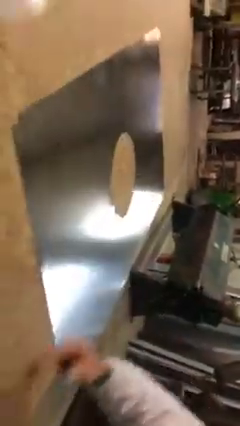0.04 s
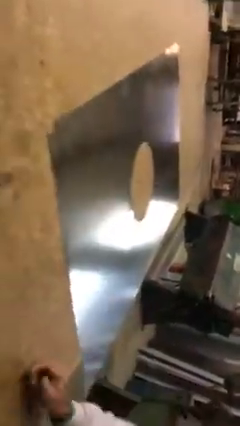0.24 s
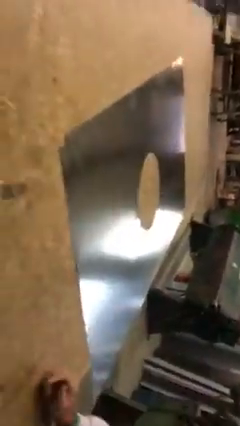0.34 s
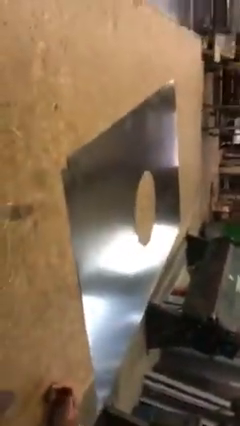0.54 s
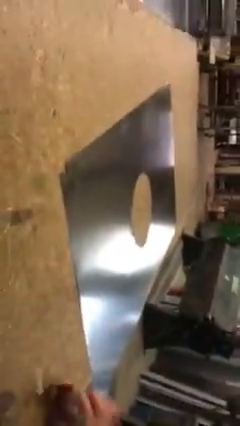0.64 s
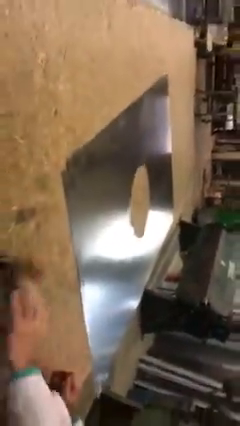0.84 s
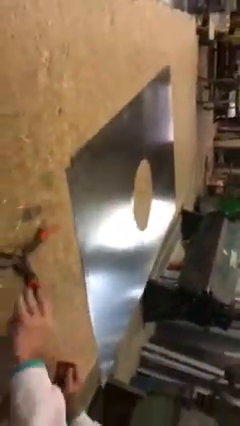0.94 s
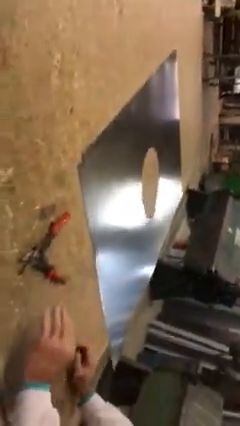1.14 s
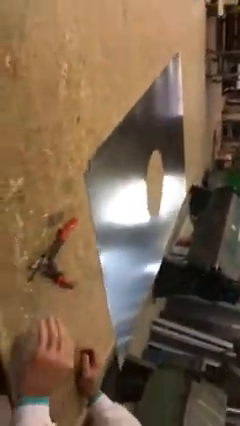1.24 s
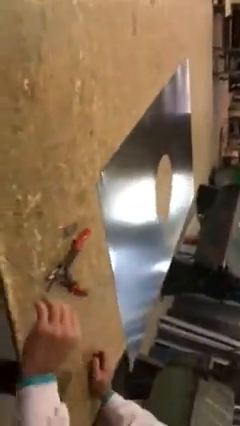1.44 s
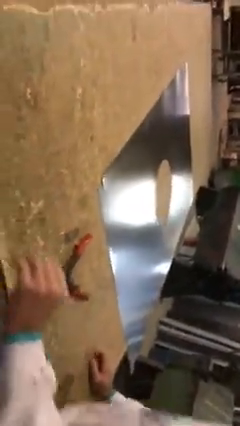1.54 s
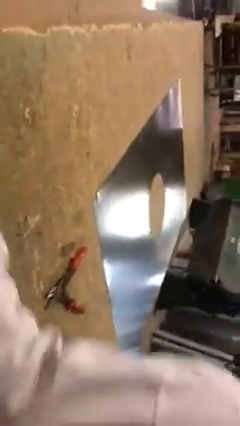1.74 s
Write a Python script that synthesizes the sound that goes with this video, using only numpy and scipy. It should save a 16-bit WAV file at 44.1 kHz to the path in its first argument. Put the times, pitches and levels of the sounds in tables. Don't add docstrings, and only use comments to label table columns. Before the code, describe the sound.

Thin sheet metal crashes and wobbles onto a wood bench, followed by dropped snips knocking and rattling

```python
import sys
import numpy as np
from scipy import signal
from scipy.fft import rfft, irfft
from scipy.io import wavfile

SR = 44100
rng = np.random.default_rng(int(sys.argv[2]) if len(sys.argv) > 2 else 0)


def boost(x):
    u = np.asarray(x, float) / 20
    return 10 ** u


def log_audio(samples):
    frames = np.atleast_2d(samples).T
    limited = np.clip(frames, -1, 1)
    pcm = np.round(limited * 32767).astype(np.int16)
    wavfile.write(sys.argv[1], SR, pcm)


N = 79380

# t/s, force level/dB, crash centre f/Hz,
# edge rattle level/dB re force, lowest free mode f/Hz
SHEET_LANDINGS = [
    [(.209, -17, 795, -4.5, 250), (.235, -8, 1430, -21, 352), (.257, -12, 1960, -9.5, 485),
     (.29, -15.5, 2230, -12.5, 510), (.315, -17.5, 1600, -13.5, 465), (.345, -17, 1420, -9.5, 480),
     (.37, -17, 1690, -11, 566), (.41, -23, 1830, -8, 540), (.45, -24, 1750, -14.5, 543)],
    [(.462, -22.5, 740, -7, 396), (.486, -20, 865, -13.5, 447), (.512, -17.5, 1300, -2.5, 510),
     (.535, -15, 2150, -9.5, 590), (.575, -20, 2200, -9, 640), (.61, -20.5, 1760, -10.5, 700),
     (.655, -30, 1840, -11.5, 764), (.72, -32.5, 2000, -10.5, 900), (.794, -39.5, 2050, -16.5, 1000),
     (.838, -38, 2030, -8, 1010), (.872, -44, 1780, -6.5, 1010)],
]
# f/Hz, level/dB
SHEET_COLOUR = [(150, -1.5), (300, -36), (620, 0.5), (1200, 7), (1800, 1.5), (2800, 3.5), (3600, -0.5),
                (5000, -53)]
# f/Hz, level/dB
RATTLE_COLOUR = [(2060, -14.5), (3500, -7), (4750, -11.5), (6280, -13), (15100, -29), (16000, -25)]
# f/Hz, level/dB
BENCH_COLOUR = [(25, -27), (45, -21), (75, -11.5), (130, -15.5), (250, -10), (480, -16.5), (650, -36)]
# t/s, peak level/dB, f/Hz
BUCKLE_POPS = [(0.211, -22, 1200), (0.22, -10, 2380), (0.225, -8.5, 1150), (0.231, -14.5, 706),
               (0.231, -10, 2240), (0.237, -11, 1420), (0.242, -6.5, 1830), (0.245, -16, 1400),
               (0.243, -14.5, 2480), (0.246, -21, 2360), (0.255, -14.5, 1640), (0.255, -9, 2360),
               (0.26, -8, 1700), (0.261, -7.5, 2160), (0.274, -6.5, 1780), (0.278, -6.5, 2050),
               (0.29, -15, 2070), (0.323, -12.5, 693), (0.332, -17, 2660), (0.334, -15.5, 1280),
               (0.35, -15.5, 1700), (0.351, -22.5, 1260), (0.352, -16, 3000), (0.354, -16, 2280),
               (0.359, -17, 1370), (0.377, -14.5, 1266), (0.38, -13.5, 1750), (0.48, -12.5, 890),
               (0.502, -20, 1310), (0.513, -16, 1400), (0.518, -18.5, 1570), (0.53, -12, 2690),
               (0.532, -12, 1660), (0.535, -19, 3330), (0.537, -15, 2660), (0.541, -11.5, 1720),
               (0.548, -13, 1760), (0.55, -23, 2850), (0.558, -16, 2880), (0.56, -18, 2300),
               (0.562, -12, 1715), (0.566, -20, 2830), (0.569, -21, 2120), (0.573, -21, 2110),
               (0.584, -14, 1670), (0.587, -15.5, 1380)]
THUD_TIMES = [.109, .210, .214, .214, .465, .505, .522, .61, .8925, .894, .902, .907, .93, .94, 1.03, 1.596,
              .11, .34, .545, 1.6, 1.603]
# level/dB, f/Hz, t60/s
THUD_TONES = [(-38, 250, 0.05), (-14, 334, 0.044), (-16.5, 630, 0.2), (-19.5, 67, 0.26),
              (-33.5, 300, 0.024), (-36, 73, 0.17), (-26.5, 390, 0.057), (-36, 81, 0.57), (-10, 720, 0.027),
              (-40, 1200, 0.018), (-23, 348, 0.11), (-24.5, 690, 0.074), (-30, 69, 0.79),
              (-26.5, 142, 0.11), (-36.5, 158, 0.25), (-31.5, 304, 0.078), (-45.5, 460, 0.033),
              (-27.5, 610, 0.075), (-32, 220, 0.091), (-40, 460, 0.024), (-39, 770, 0.034)]
# t/s, peak level/dB, knock f/Hz,
# jaw rattle level/dB re peak
WOOD_BLOWS = [(0.1105, -42, 1020, -29), (.20865, -3, 2120, -8.5), (.8912, -8.5, 1760, 0),
              (.894, -7, 2580, -7), (.896, -23.5, 950, -19), (0.9158, -25.5, 900, 4.5),
              (0.932, -24, 1860, 1), (0.9016, -19, 2300, -27), (0.9353, -33, 1510, 11),
              (0.9363, -18.5, 1930, -23), (0.9389, -2.5, 2590, -29.5), (.9425, -21.5, 1510, -7),
              (0.9669, -1.5, 1270, -22), (0.9713, -15, 1400, -22), (.993, -16, 1100, -20),
              (1.0027, -10, 1173, -24), (1.0054, -17.5, 1200, -21), (1.026, -27, 2300, -24),
              (1.031, -21, 1500, -27), (1.0493, -14, 1300, -36), (1.0657, -15, 1490, -42),
              (1.088, -15.5, 1640, -43), (1.105, -34.5, 918, -38), (1.5952, -26.5, 1255, -30)]
KNOCK_BAND = [480, 5200]
# f/Hz, level/dB
WOOD_COLOUR = [(120, -17.5), (220, 1), (400, -4), (750, -3.5), (1300, -0.5), (2500, -4), (4500, -7.5),
               (8000, -23.5)]
# f/Hz, width/Hz, level/dB
JAW_MODES = [(4270, 600, -8), (6340, 130, -19.5), (6560, 830, -7), (9060, 1400, -1.5), (13900, 3400, -7)]
# t/s, length/s, level/dB, bright share level/dB
RUBS = [
    (0.0, 0.088, -65.5, -10),
    (0.113, 0.038, -62, -6),
    (0.807, 0.025, -55, 2),
    (1.172, 0.046, -51.5, -6.5),
    (1.25, 0.12, -67.5, -3.5),
    (1.45, 0.042, -72, -10),
    (1.604, 0.038, -44, 2),
    (1.634, 0.018, -50, -8),
]
# f/Hz, level/dB
HISS_COLOUR = [(2350, -32), (4000, -8), (5570, 8), (7530, -1.5), (11600, -3.5), (15100, -7.5), (16000, -21)]
# f/Hz, level/dB
BODY_COLOUR = [(290, -53.5), (500, -17), (1440, -11.5), (2120, -3.5), (2300, -6), (4500, -19),
               (5850, -49.5), (9900, -120)]
# middle t/s, length/s, level/dB, f/Hz
RUB_NOTES = [(0.003, 0.046, -53, 1830), (0.039, .035, -52, 1780), (0.079, .025, -56, 1800),
             (0.138, .014, -57, 2560), (0.1994, .007, -43.5, 3074), (1.205, 0.026, -55, 3480),
             (1.197, 0.039, -49, 2480), (1.588, .01, -53, 1450), (1.611, 0.021, -45, 2130),
             (1.633, 0.023, -33.5, 2160), (1.653, .014, -39.5, 3080), (1.656, 0.038, -36.5, 1970),
             (1.647, 0.065, -49, 1630), (1.665, 0.034, -43, 2610), (1.64, .03, -41, 2830),
             (1.708, .02, -49, 2150)]
# t/s, length/s, level/dB, centre f/Hz, width/Hz
CLOTH_WHISPERS = [
    (.915, .008, -44, 9000, 1500),
    (1.185, .045, -58, 12500, 2500),
    (1.46, .06, -73, 9000, 2200),
]
# f/Hz, level/dB
SHOP_COLOUR = [(15, -49), (32, -18.5), (84, -18.5), (123, -21.5), (185, -30), (242, -29), (309, -39),
               (887, -46), (16000, -72.5)]
# t/s, level/dB
MOTOR_RISE = [(1.2, -86), (1.244, -47), (1.8, -37)]


def in_time(rows):
    s, *columns = np.transpose(rows)
    return [np.interp(np.arange(N) / SR, s, column) for column in columns]


def rms_one(x):
    return x / np.sqrt(np.mean(x ** 2) + 1e-20)


def colour(x, points):
    hz, db = np.transpose(points)
    log_f = np.log(np.maximum(np.fft.rfftfreq(len(x), 1 / SR), 1))
    gain = boost(np.interp(log_f, np.log(hz), db, left=-90, right=-90))
    return rms_one(irfft(rfft(x) * gain, len(x)))


def low_pass(x, hz):
    return signal.sosfilt(signal.butter(2, hz, fs=SR, output="sos"), x)


def band_pass(x, low, high):
    return signal.sosfilt(signal.butter(2, [low, high], "band", fs=SR, output="sos"), x)


def ring(x, hz, t60):
    r, w = boost(-60 / (t60 * SR)), 2 * np.pi * hz / SR
    return signal.lfilter([0, np.sin(w)], [1, -2 * r * np.cos(w), r * r], x + 1e-18)


def click(s, db):
    x = np.zeros(N)
    x[int(s * SR)] = boost(db)
    return x


def grains(rate, spread_db):
    sizes = boost(spread_db * np.minimum(rng.exponential(1, N), 5)) * rng.choice([-1, 1], N)
    return rms_one(sizes * (rng.random(N) < rate / SR))


def dying(t60, seconds):
    t = np.arange(int(seconds * SR)) / SR
    x = rng.standard_normal(len(t)) * boost(-60 * t / t60)
    return x / np.sqrt(np.sum(x ** 2))


def sheet_drive(centre, lowest):
    focus_db, focus_oct, edge_db_per_oct = 6, 0.55, 26
    touches = colour(grains(7000, 2.5), SHEET_COLOUR)
    drive = np.zeros(N)
    edges = 140 * 2 ** (np.arange(17) / 3)
    for low, high in zip(edges, edges[1:]):
        hz = np.sqrt(low * high)
        near = np.exp(-(np.log2(hz / centre) / focus_oct) ** 2 / 2)
        below_modes = np.maximum(np.log2(lowest / hz), 0)
        gain_db = focus_db * (near - 0.5) - edge_db_per_oct * below_modes
        drive += band_pass(touches, low, high) * boost(gain_db)
    return drive


def sheet_wash(drive):
    t60_s, reshape_s = 0.3, 0.04
    t = np.arange(N) / SR
    wash = np.zeros(N)
    for k in range(24):
        share = np.sqrt(np.maximum(1 - np.abs((t - 0.2) / reshape_s - k), 0))
        wash += signal.fftconvolve(drive * share, dying(t60_s, 0.25))[:N]
    return wash


def sheet():
    rows = list(SHEET_LANDINGS[0]) + list(SHEET_LANDINGS[1])
    force, centre, edge, lowest = in_time(rows)
    t = np.arange(N) / SR
    on = (t >= rows[0][0]) * np.exp(-np.maximum(t - rows[-1][0], 0) / 0.06)
    drive = sheet_drive(centre, lowest) * on * boost(force)
    rattle = colour(grains(9000, 1.2), RATTLE_COLOUR) * on * boost(force + edge - 1)
    airborne = (t > 0.365) & (t < 0.46)
    rumble_db = -43 + 1.07 * (force + 21.0) - 11.5 * airborne
    rumble = colour(rng.standard_normal(N), BENCH_COLOUR) * on * boost(rumble_db)
    return rumble + 1.51 * drive + boost(-5) * sheet_wash(drive) + rattle


def pops():
    t60_s = 0.022
    out = np.zeros(N)
    for s, db, hz in BUCKLE_POPS:
        out += ring(ring(click(s, db), hz, t60_s), hz, 4.35 / hz) * 3.54 * hz / SR
    return out


def thuds():
    out = np.zeros(N)
    for s, (db, hz, t60) in zip(THUD_TIMES, THUD_TONES):
        push = ring(ring(click(s, db), hz, t60), hz, 2 / hz)
        out += low_pass(push * 7 * hz / SR, 1500)
    return out


def wood_blow(db, hz):
    contact_cycles, travel_cycles = 0.14, 2.5
    arrival_centre, arrival_spread = 0.96, 0.24
    wood_t60_s, wood_rise_s = 0.032, 0.0015
    t, age = np.arange(-128, 3968) / SR, np.arange(4096) / SR
    late = np.maximum(1 + t * hz / travel_cycles, 0.05)
    arrival = np.exp(-(np.log(late / arrival_centre) / arrival_spread) ** 2 / 2)
    knock = boost(db + 0.5) * arrival * np.cos(2 * np.pi * travel_cycles / late)
    push = boost(db) * np.exp(-(t * hz / contact_cycles) ** 2 / 2)
    wood = colour(rng.standard_normal(4096), WOOD_COLOUR)
    wood = wood * boost(-60 * age / wood_t60_s) * (1 - np.exp(-(age / wood_rise_s) ** 2))
    answer = signal.fftconvolve(push, wood)[:len(t)] * hz / SR
    return band_pass(knock, *KNOCK_BAND) + boost(2) * answer


def jaw_chatter(blows):
    t60_s = 0.017
    decay = boost(-60 / (t60_s * SR))
    chatter = signal.lfilter([1], [1, -decay], blows + 1e-18) * grains(9000, 2.5)
    tones = np.zeros(N)
    for hz, width, db in JAW_MODES:
        tones += boost(db) * ring(chatter, hz, 1.3 / width) * np.sqrt(width / SR)
    return boost(3) * (tones + 0.11 * np.diff(chatter, prepend=0))


def snips():
    out, jaws = np.zeros(N + 4096), np.zeros(N)
    for s, db, hz, jaw_db in WOOD_BLOWS:
        start = int(s * SR) - 128
        out[start:start + 4096] += wood_blow(db, hz)
        jaws += click(s - 0.0004, db + jaw_db)
    return out[:N] + jaw_chatter(jaws)


def scuffs():
    attack_s, release_s = 0.018, 0.029
    rough, wobble_hz = 0.26, 90
    t, out = np.arange(N) / SR, np.zeros(N)
    body = colour(grains(7100, 0.83), BODY_COLOUR)
    hiss = colour(grains(13000, 2.1), HISS_COLOUR)
    for s, length, db, bright_db in RUBS:
        rise = np.clip((t - s) / attack_s + 0.01, 0, 1)
        fall = np.exp(-np.maximum(t - s - length, 0) / release_s)
        out += boost(db) * rise * fall * (0.61 * boost(10) * body + boost(bright_db) * hiss)
    wobble = rms_one(low_pass(rng.standard_normal(N), wobble_hz))
    for s, length, db, hz in RUB_NOTES:
        swell = np.exp(-(2 * (t - s) / length) ** 4)
        out += boost(db) * swell * (1 + rough * wobble) * np.sin(2 * np.pi * hz * t)
    return out


def whispers():
    t, out = np.arange(N) / SR, np.zeros(N)
    for s, length, db, hz, width in CLOTH_WHISPERS:
        swell = np.exp(-((t - s - length / 2) / (0.44 * length)) ** 4)
        hiss = ring(ring(rng.standard_normal(N), hz, 2.4 / width), hz, 2.0 / width)
        out += boost(db) * swell * rms_one(hiss)
    return out


def room(x):
    t60_s, wall_cut_hz, delay_s = 0.63, 7000, 0.004
    slow = band_pass(dying(t60_s, 1.2), 500, wall_cut_hz)
    quick = np.pad(dying(0.6 * t60_s, 0.8), (0, len(slow)))[:len(slow)]
    tail = np.r_[np.zeros(int(delay_s * SR)), slow + 0.5 * quick]
    return boost(-13.5) * signal.fftconvolve(x, tail)[:N]


def shop():
    hum_hz, hum_width_hz = 123.4, 24
    hum_db, = in_time([(0, -49.5), (1.1, -51)] + list(MOTOR_RISE))
    drone = ring(ring(rng.standard_normal(N), hum_hz, 0.73 / hum_width_hz), hum_hz, 0.19)
    return boost(-46) * colour(rng.standard_normal(N), SHOP_COLOUR) + boost(hum_db) * rms_one(drone)


def scene():
    near = sheet() + snips() + scuffs() + pops() + whispers()
    return (near + room(near) + thuds() + shop())[None]


def band_limit(x):
    return signal.sosfilt(signal.butter(12, 16980, fs=SR, output="sos"), x)


def record(dry):
    ceiling = 0.72
    dry = signal.sosfilt(signal.butter(2, 45, "high", fs=SR, output="sos"), dry)
    held = dry / (1 + (dry / ceiling) ** 4) ** 0.25
    mix = signal.sosfilt(signal.cheby2(10, 60, 17300, fs=SR, output="sos"), held)
    return band_limit(mix)


dry = scene()
out = record(dry)
log_audio(out)
```